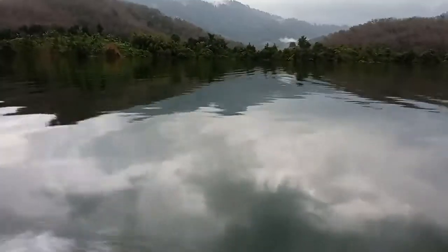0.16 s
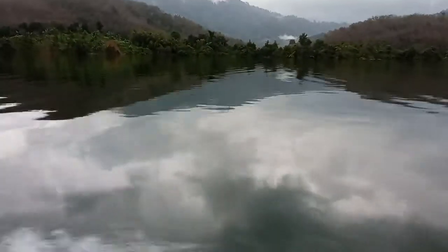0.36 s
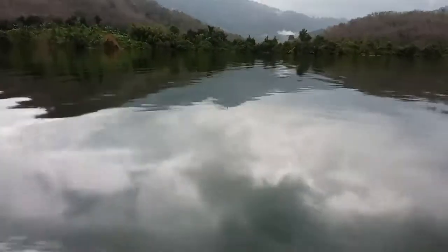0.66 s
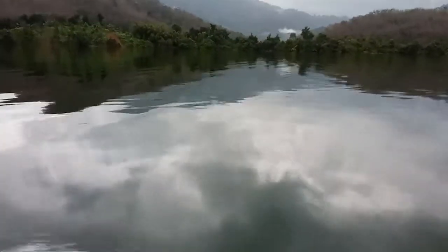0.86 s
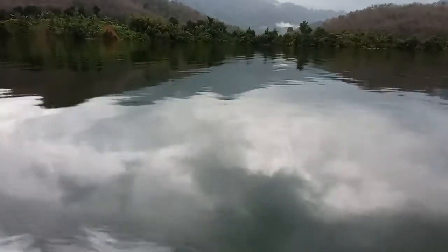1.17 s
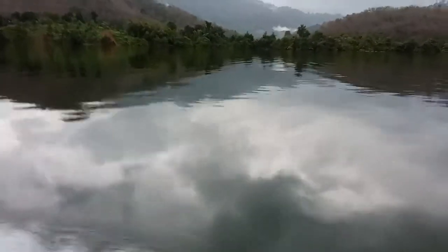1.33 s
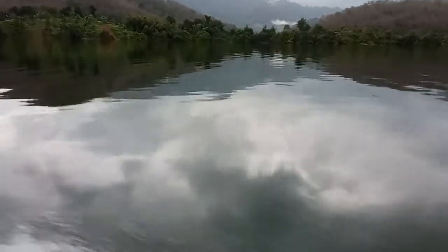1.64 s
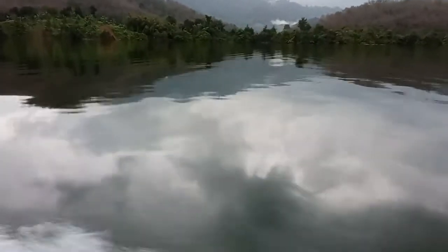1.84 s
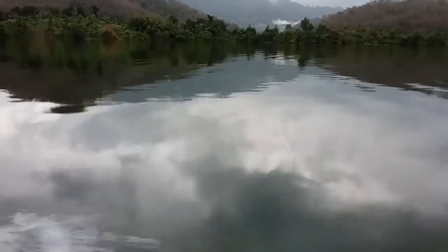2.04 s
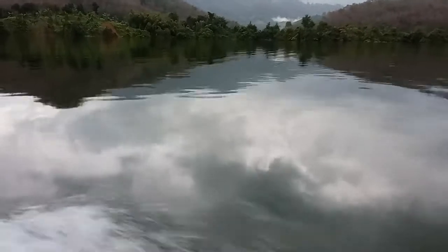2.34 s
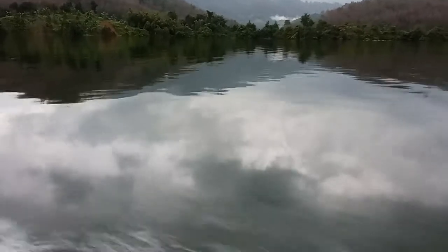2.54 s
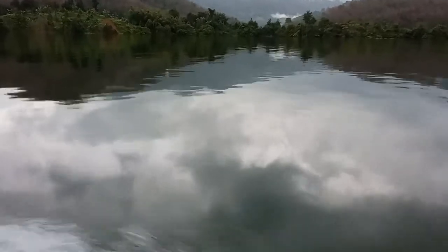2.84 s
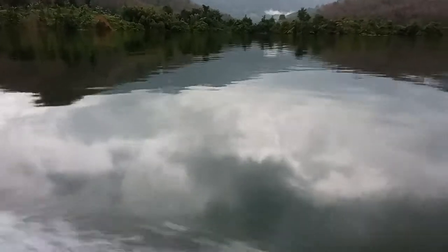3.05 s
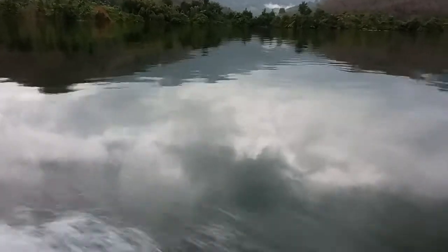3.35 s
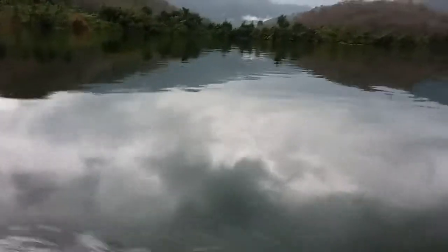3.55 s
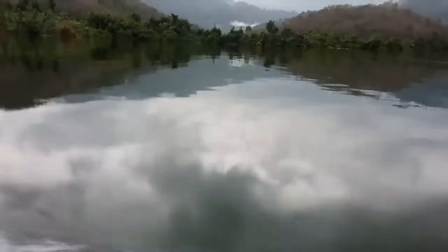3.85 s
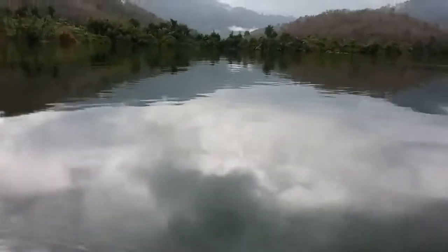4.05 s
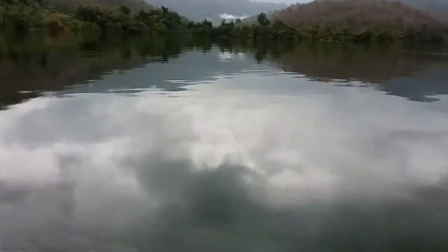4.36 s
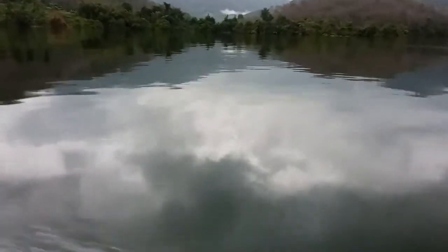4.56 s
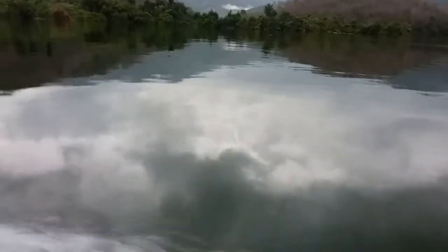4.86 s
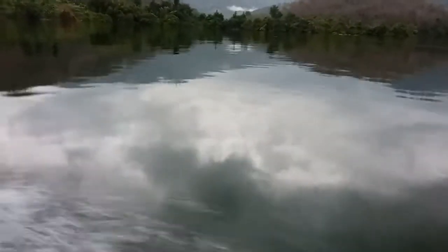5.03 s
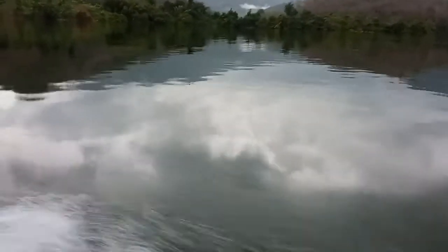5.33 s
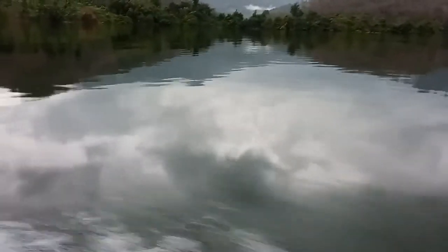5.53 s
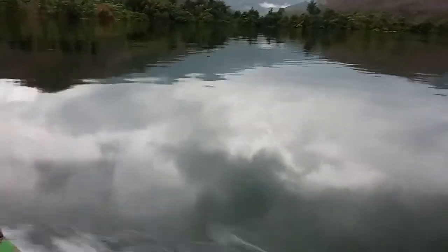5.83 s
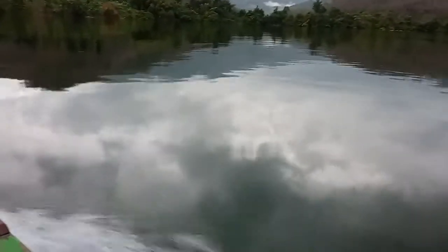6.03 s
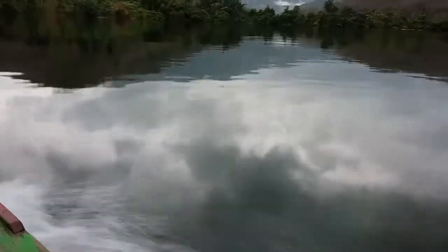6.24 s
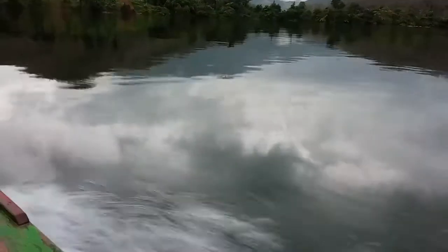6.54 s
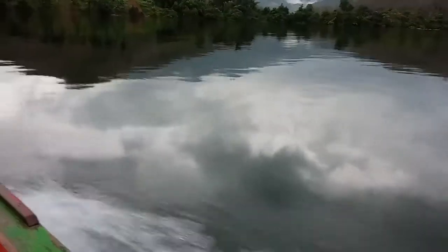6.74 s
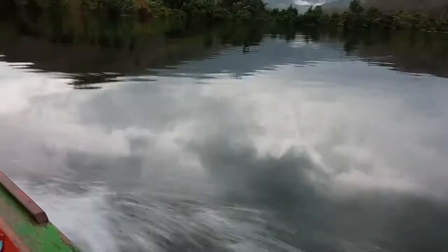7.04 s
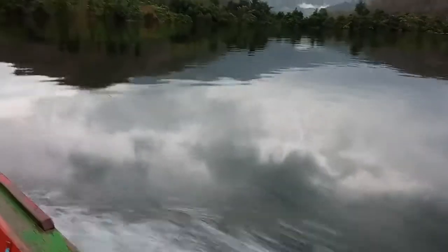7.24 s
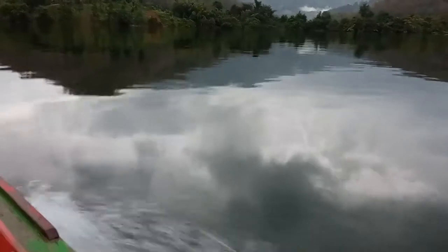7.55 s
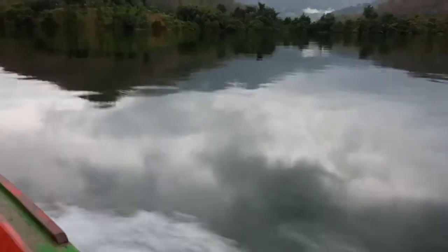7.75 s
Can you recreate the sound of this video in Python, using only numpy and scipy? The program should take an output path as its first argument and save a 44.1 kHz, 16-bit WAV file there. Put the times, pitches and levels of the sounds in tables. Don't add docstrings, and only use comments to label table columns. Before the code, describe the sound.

A simple boat motor runs continuously at one pitch, a dense buzzing putter with hard, uneven metal clacks and a soft intake gulp between beats. The knocking briefly eases, grows hardest midway, then softens near the end. The bow wave hisses quieter behind it, swelling gently. Outdoors on open water, heard close and dry through a small microphone with thin deep bass.

```python
import sys
import numpy as np
from scipy import signal
from scipy.fft import rfft, irfft
from scipy.io import wavfile
from scipy.ndimage import uniform_filter1d

SR = 44100
rng = np.random.default_rng(int(sys.argv[2]) if len(sys.argv) > 2 else 0)


def bounce(signal):
    frames = np.transpose(np.atleast_2d(signal))
    limited = np.clip(frames, -1, 1)
    pcm = np.round(limited * 32767).astype(np.int16)
    wavfile.write(sys.argv[1], SR, pcm)


def field_ratio(decibels):
    return 10 ** (np.asarray(decibels, dtype=float) / 20)


N = 347949

FIRST_S, CYCLE_S = .02724, .0428142
SHELL_MS, BLOW_MS, RATTLE_MS, KNOCK_MS, CASE_MS, GULP_MS = -6.79, -6.18, -5.2, -4.55, -4, 16.92
VALVE_MS = 1.74
USUAL_LOAD_DB = -21
KNOCK_HZ, KNOCK_SPREAD, SCATTER_DB = 2220, 0.059, 2.5
STRAY_SHARE, STRAY_HZ = .33, 2890
SPRAY_DB, MIST_DB, WASH_DB = -35.5, -35.5, -37
MIST_GUST_DB = 1

# time in seconds, how late the firing is against an even beat in ms.
LATE = [(0.0, 3.2), (0.1, 4.9), (0.48, 4.0), (1.0, 0.1), (1.46, 1.6), (1.97, -2.0), (2.24, 0.3),
        (3.12, 0.8), (3.4, -4.7), (3.6, -5.3), (3.74, -4.1), (4.35, -0.9), (4.61, -0.7), (4.87, -3.1),
        (5.3, -2.3), (5.7, -3.4), (7.72, 6.1), (7.89, 5.5)]
# time in seconds, exhaust level in dB.
LOAD = [(0.0, -21.5), (0.23, -20.5), (0.6, -21.5), (1.1, -20.2), (1.45, -23.6), (1.75, -21.5), (2.47, -20),
        (3.0, -22.2), (3.3, -19.5), (3.55, -22), (4.05, -20.5), (4.25, -22), (4.72, -20), (5.3, -22),
        (5.7, -19.5), (5.95, -22), (6.75, -19), (7.89, -21)]
# time in seconds, level in dB.
KNOCK_LEVEL = [
    (0.0, -22),
    (1.2, -20.5),
    (1.5, -26.5),
    (1.8, -20.5),
    (3.4, -21),
    (4.0, -19.5),
    (5.3, -21),
    (5.95, -24),
    (7.35, -28),
    (7.89, -21),
]
# pitch in Hz, level in dB, time to die by 60 dB in seconds, sign.
SHELL_TONES = [(374.3, -35.3, 0.214, 1), (425.4, -25.4, 0.033, -1), (565.8, -39.4, 0.058, 1)]
# pitch in Hz, level in dB, time to die by 60 dB in seconds,
# first movement (+1 pushes, -1 pulls).
EXHAUST_TONES = [(72.8, -26.6, 0.163, 1), (108.7, -11.9, 0.214, 1), (165.7, 4.5, 0.07, -1),
                 (257.5, 3.1, 0.051, 1), (378.0, -5.1, 0.212, 1)]
# pitch in Hz, level in dB, time to die by 60 dB in seconds, sign.
INTAKE_TONES = [(139.3, -6.0, 0.053, 1), (209.3, -17.1, 0.214, -1), (258.4, -9.8, 0.214, -1),
                (307.6, -5.4, 0.158, -1)]
# frequency in Hz, level in dB.
PIPE_END = [(24, -18), (40, 0)]
# frequency in Hz, level in dB.
TIN = [(300, -28), (500, 3), (900, -8.5), (1300, -0.5), (2200, 4), (4000, -4.5), (6300, -3), (8000, -10),
       (9600, -6.5), (12000, -20), (13800, -23), (14700, -14), (15700, -28.5)]
# pitch in Hz, width in Hz (wider dies faster), level in dB.
BLOCK = [(1840, 140, -10.5), (2250, 73, -5), (2750, 250, -3), (3304, 320, 2), (5220, 240, -9),
         (7990, 140, -11), (8580, 250, -23.5), (12500, 400, -17), (14100, 300, -36)]
# time in seconds, peak in dB, pitch in Hz.
HARD_KNOCKS = [(0.4973, -14.5, 2300), (0.624, -17, 2220), (1.0071, -21, 2600), (1.1358, -15, 2250),
               (1.1787, -16.5, 2200), (1.3074, -14.5, 2200), (1.4366, -17, 2220), (1.9899, -16, 2000),
               (2.2059, -19, 3400), (2.4633, -18, 2170), (2.6344, -16.5, 3260), (2.9771, -16.5, 2380),
               (3.02, -17.5, 2140), (3.2321, -17, 3140), (3.2745, -18.5, 2250), (3.7432, -16, 2250),
               (3.8292, -17, 2250), (3.915, -18.5, 2320), (4.0437, -12.5, 2260), (4.0877, -12.5, 2280),
               (4.1305, -17.5, 2160), (4.2595, -18, 2750), (4.4316, -18.5, 2290), (4.5171, -17.5, 2200),
               (4.8574, -17, 2460), (4.9861, -16.5, 2280), (5.0724, -15, 2250), (5.243, -18, 2180),
               (5.3293, -15, 2320), (7.8206, -23, 2200)]
# pitch in Hz, level in dB, time to die by 60 dB in seconds, sign and size.
CASE_TONES = [(792, -36, 0.024, 0.73), (944, -39, 0.019, -0.81)]
# frequency in Hz, level in dB.
SPRAY = [(300, 2.5), (450, -2.5), (820, -4.5), (1250, -10.5), (2250, -7.5), (4400, -15.5), (6400, -11),
         (7000, -16), (8000, -21.5), (9600, -15), (11500, -26), (13900, -31.5), (14600, -21),
         (15700, -21.5)]
# time in seconds, surge in dB.
WAKE = [(0.0, -0.4), (0.44, 1.1), (1.47, -0.9), (2.02, 0.8), (2.68, 1.6), (3.01, -0.8), (3.34, 1.2),
        (3.63, -0.9), (4.0, 1.4), (4.6, 0.6), (4.85, 0.5), (5.1, 0.5), (5.93, 0.2), (6.74, 1.8), (7.0, 0.8),
        (7.89, 0)]
# frequency in Hz, level in dB.
HULL = [(10, -13), (25, 7), (50, 9), (70, 9), (120, 15.5), (230, 17), (330, -0.5), (400, -22), (600, -1),
        (1000, -47)]
# time in seconds, level in dB.
RUMBLE = [
    (0, -36.5),
    (5.5, -36),
    (7.1, -34),
    (7.89, -35.5),
]
# time in seconds, peak in dB.
DROPS = [(0.6055, -36), (0.839, -39), (0.959, -35), (1.483, -36), (2.3221, -34), (2.4448, -30),
         (2.5456, -32), (4.5146, -34), (4.6872, -35), (4.9975, -29), (5.0654, -33), (5.2679, -37)]
# frequency in Hz, level in dB.
DRIP = [(3000, -30), (7000, -12), (10000, 10), (12000, -4), (13500, 0), (15000, 1), (16000, -3)]
# frequency in Hz, level in dB.
MIC = [(15715, 0), (15800, -25), (15950, -55)]


def evened(x):
    return x / np.sqrt(np.mean(x ** 2) + 1e-20)


def colour(x, points):
    f, db = np.transpose(points)
    hz = np.fft.rfftfreq(len(x), 1 / SR)
    gain = field_ratio(np.interp(np.log(hz + 1), np.log(f), db))
    return irfft(rfft(x) * gain, len(x))


def curve(table, t):
    s, value = np.transpose(table)
    return np.interp(t, s, value)


def train(s, size):
    at, out = s * SR, np.zeros(N + 2 * SR)
    whole = np.floor(at).astype(int) + SR
    np.add.at(out, whole, size * (1 - at % 1))
    np.add.at(out, whole + 1, size * (at % 1))
    return out


def through(clicks, shape):
    return signal.oaconvolve(clicks, shape)[SR:SR + N]


def ring(modes, count=SR // 4):
    t = np.arange(count) / SR
    return sum(sign * field_ratio(db - 60 * t / t60) * np.sin(2 * np.pi * hz * t) for hz, db, t60, sign in modes)


def patchy(points, patch_db, flicker_db):
    frames = N // 64 + 8
    a, b, patches = rng.standard_normal((frames, 129, 3)).T
    patches = uniform_filter1d(patches, size=6, axis=0)
    patches = evened(uniform_filter1d(patches, size=30, axis=1))
    flicker = evened(uniform_filter1d(rng.standard_normal(frames), size=20))
    z = (a + 1j * b) * field_ratio(patch_db * patches + flicker_db * flicker)
    noise = signal.istft(z, nperseg=256, noverlap=192)[1][:N]
    return evened(colour(noise, points))


def shell(s, blow_db, luck):
    return through(train(s + SHELL_MS / 1000, field_ratio(blow_db + 0.69 * luck)), ring(SHELL_TONES))


def pipe(clicks, tones):
    r = np.exp(-1000 / (VALVE_MS * SR))
    soft = signal.lfilter([(1 - r) ** 2], [1, -2 * r, r * r], through(clicks, ring(tones)))
    return colour(soft, PIPE_END)


def exhaust(s, blow_db, luck):
    return pipe(train(s + BLOW_MS / 1000, field_ratio(blow_db + .45 * luck)), EXHAUST_TONES)


def rattle(s, knock_db, firing_luck, gulp_luck):
    t = np.arange(1500) / SR
    fade = (1 - np.exp(-t / 0.0018)) ** 2 * np.exp(-t / 0.0068)
    shake = through(train(s + RATTLE_MS / 1000, field_ratio(.3 * (knock_db + 22) + firing_luck)), fade)
    shake += through(train(s + (GULP_MS + 2.5) / 1000, field_ratio(-14 + 3.0 * gulp_luck)), fade)
    return field_ratio(-28.0) * shake * patchy(TIN, patch_db=1.0, flicker_db=0.7)


def knock_plan(s, knock_db, time_luck, level_luck, pitch_luck):
    knock_s = s + (KNOCK_MS + .2 * time_luck) / 1000
    knock_db = knock_db + SCATTER_DB * np.clip(level_luck, -3, 1.2)
    knock_hz = np.where(rng.random(len(s)) < STRAY_SHARE, STRAY_HZ, KNOCK_HZ)
    knock_hz = knock_hz * np.exp(KNOCK_SPREAD * pitch_luck)
    hard_s, hard_db, hard_hz = np.transpose(HARD_KNOCKS)
    cycle = abs(hard_s[:, None] - knock_s).argmin(axis=1)
    knock_db[cycle], knock_hz[cycle] = hard_db - .3, hard_hz * 0.978
    return knock_s, knock_db, knock_hz


def knocks(s, db, hz):
    t, out = np.arange(900) / SR, np.zeros(N + 2 * SR)
    luck = rng.uniform(-1.1, 1, (len(s), len(BLOCK) + 1, 2))
    for at, level_db, pitch_hz, (start, *draw) in zip(s, db, hz, luck):
        turns = pitch_hz * (t + 0.29 * 0.00068 * (1 - np.exp(-t / 0.00025)))
        slosh = t ** 2 * np.exp(-t / 0.00034) * np.sin(2 * np.pi * (turns + start[0]))
        modes = []
        for (f, width, g), (share, detune) in zip(BLOCK, draw):
            mode_db = g + 7 * share * min(1, 4000 / f) ** .5
            modes.append((f + 90 * detune, mode_db, 2.32 / width, np.sign(detune)))
        block = ring(modes, count=len(t)) * (1 - np.exp(-t / 0.00033)) ** 2
        tick = slosh / abs(slosh).max() + field_ratio(-2.5) * block
        out[round(at * SR) + SR:][:len(t)] += field_ratio(level_db) * tick / abs(tick).max()
    return out[SR:SR + N]


def crankcase(s, blow_db, level_luck, time_luck):
    at = s + (CASE_MS + .5 * time_luck) / 1000
    return through(train(at, field_ratio(blow_db + 3.3 * level_luck)), ring(CASE_TONES))


def intake(s, blow_db, luck):
    stretch = np.diff(s, append=s[-1] + CYCLE_S) / CYCLE_S
    gulp_ms = BLOW_MS + (GULP_MS - BLOW_MS) * stretch
    return pipe(train(s + gulp_ms / 1000, field_ratio(blow_db + .65 * luck)), INTAKE_TONES)


def engine():
    even = FIRST_S + CYCLE_S * np.arange(-4, 186)
    luck = rng.standard_normal((9, len(even)))
    s = even + (curve(LATE, even) + 0.089 * luck[0]) / 1000
    blow_db, knock_db = curve(LOAD, even) - USUAL_LOAD_DB, curve(KNOCK_LEVEL, even)
    knock_s, knock_db, knock_hz = knock_plan(s, knock_db, luck[4], luck[5], luck[6])
    out = shell(s, blow_db, luck[3]) + exhaust(s, blow_db, luck[1])
    out += rattle(s, knock_db, luck[7], luck[8])
    out += knocks(knock_s, knock_db, knock_hz)
    return out + crankcase(s, blow_db, luck[7], luck[8]) + intake(s, blow_db, luck[2])


def spatter():
    t = np.arange(200) / SR
    flecks = field_ratio(5.7 * np.minimum(rng.exponential(1, N), 4)) * (rng.random(N) < 150 / SR)
    bursts = signal.oaconvolve(flecks, np.exp(-t / 0.00074))[:N] * rng.standard_normal(N)
    return evened(colour(colour(bursts, SPRAY), [(1000, -29), (7000, -4.5), (12000, -10.5)]))


def bow_spray(surge_db, drum_db):
    spray = patchy(SPRAY, patch_db=1.5, flicker_db=0.65) + field_ratio(-16) * spatter()
    mist = colour(spray, [(7000, -40), (10000, 0)])
    wash = colour(spray, [(1000, 0), (1500, -40)])
    slow = uniform_filter1d(uniform_filter1d(rng.standard_normal(N), size=4000), size=4000)
    puffs = field_ratio(MIST_GUST_DB * evened(slow))
    wash_db = WASH_DB + 0.99 * surge_db + drum_db - drum_db[0]
    out = field_ratio(SPRAY_DB + surge_db) * (spray - mist - wash)
    return out + field_ratio(MIST_DB + surge_db) * mist * puffs + field_ratio(wash_db) * wash


def hull_rumble(drum_db):
    return field_ratio(drum_db) * patchy(HULL, patch_db=0.0, flicker_db=0.5)


def drops():
    t, out = np.arange(256) / SR, np.zeros(N)
    for s, db in DROPS:
        tick = colour(rng.standard_normal(len(t)), DRIP) * t * np.exp(-t / 0.00063)
        out[round(s * SR):][:len(t)] += field_ratio(db + 2.5) * tick / abs(tick).max()
    return out


def water():
    t = np.arange(N) / SR
    surge_db, drum_db = curve(WAKE, t), curve(RUMBLE, t)
    return bow_spray(surge_db, drum_db) + hull_rumble(drum_db) + drops()


def scene():
    return (engine() + water())[None]


def roll_off(x):
    return signal.sosfilt(signal.butter(12, 17090, fs=SR, output="sos"), x)


def record(dry):
    keep = np.exp(-2 * np.pi * 40 / SR)
    cut = signal.lfilter([1, -2, 1], [1, -2 * keep, keep ** 2], dry[0])
    return roll_off(colour(cut, MIC)[None])


dry = scene()
out = record(dry)
bounce(out)
```